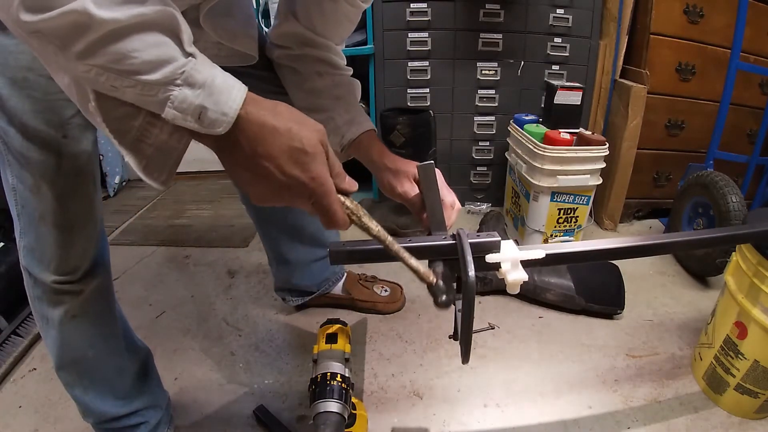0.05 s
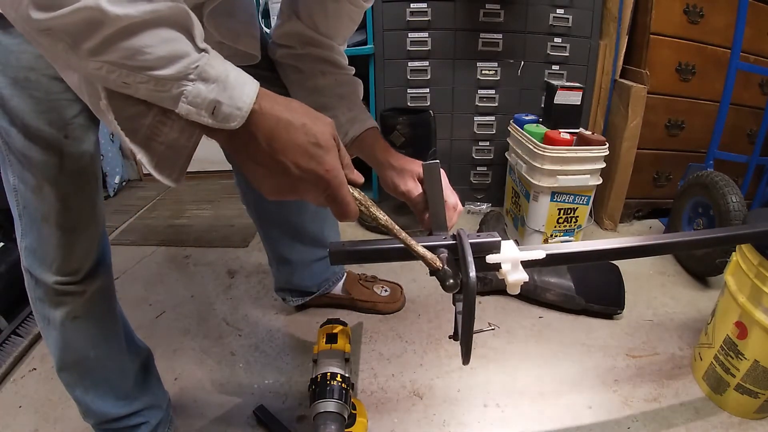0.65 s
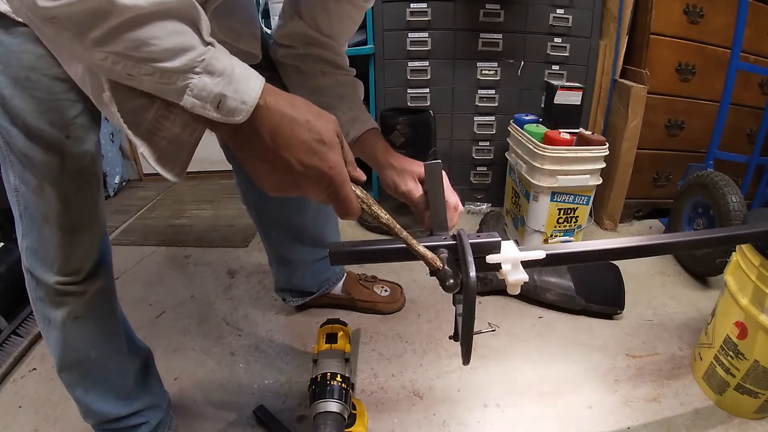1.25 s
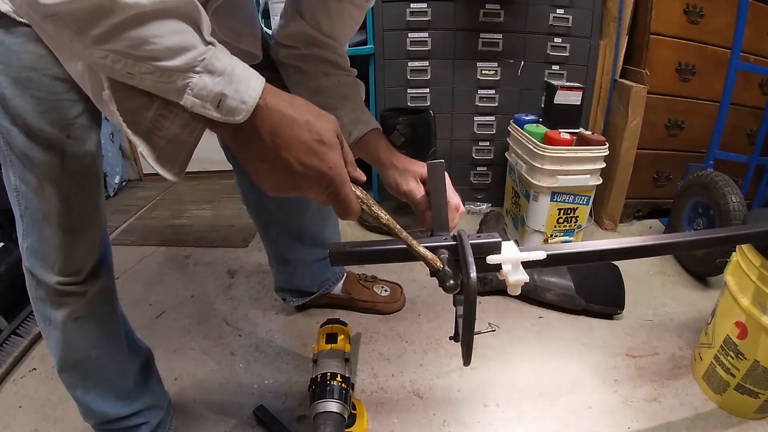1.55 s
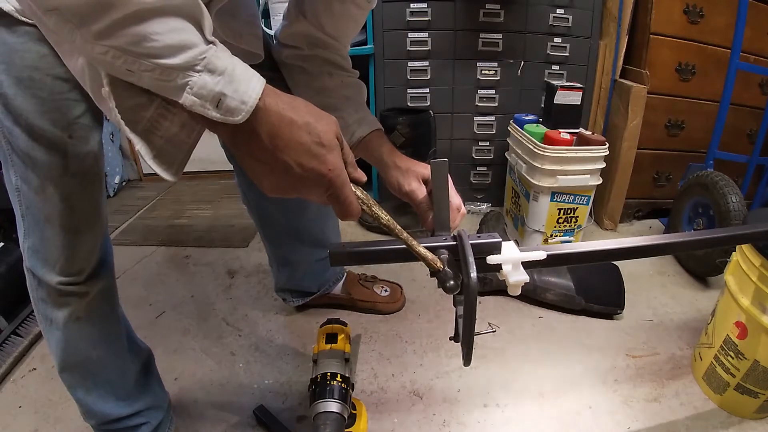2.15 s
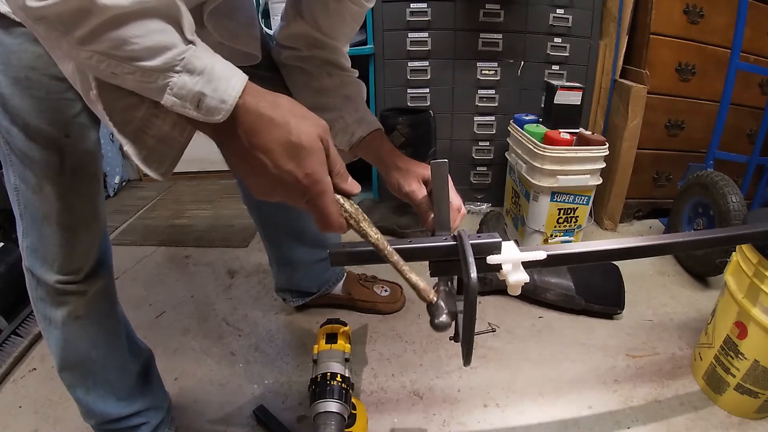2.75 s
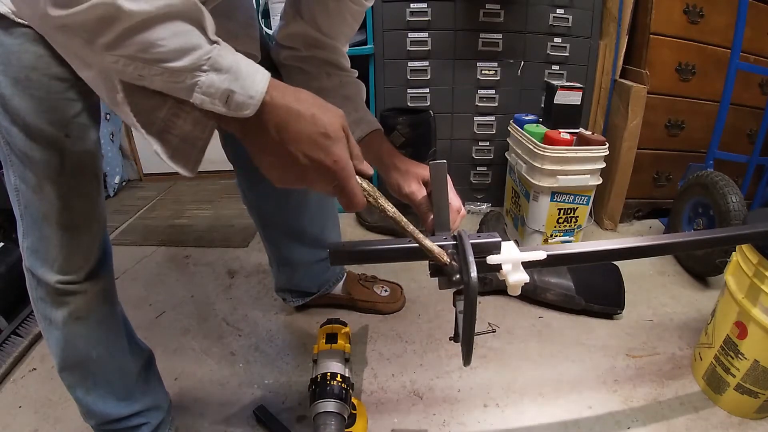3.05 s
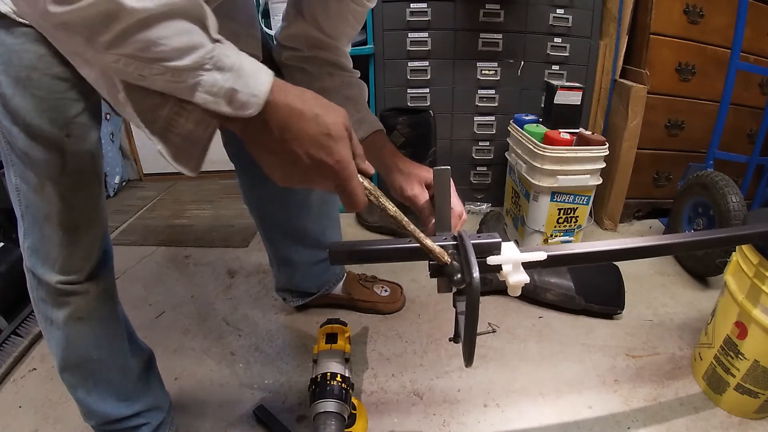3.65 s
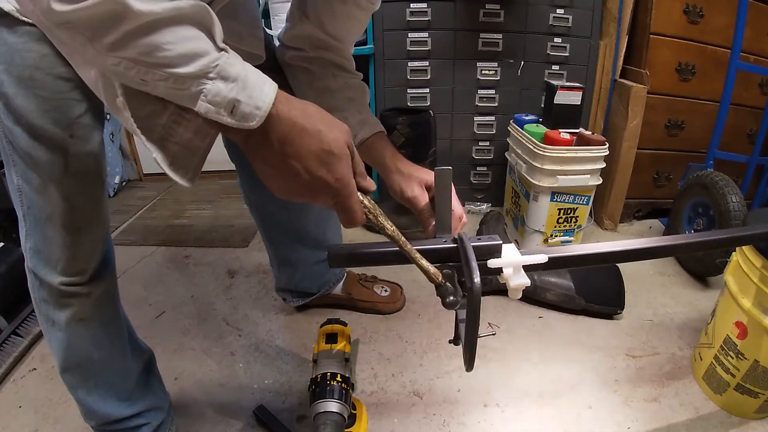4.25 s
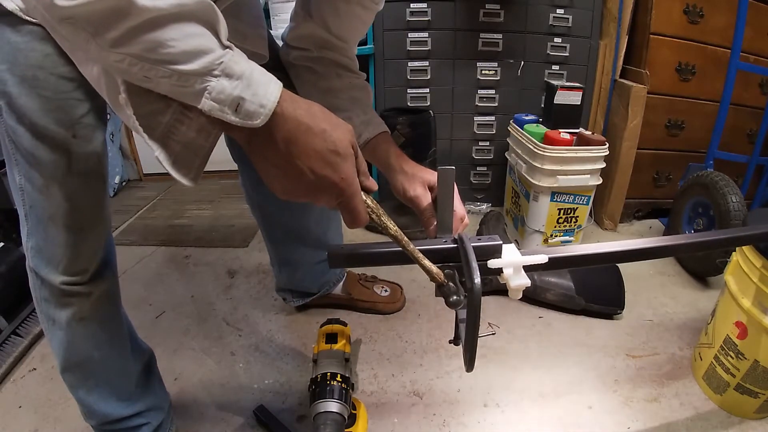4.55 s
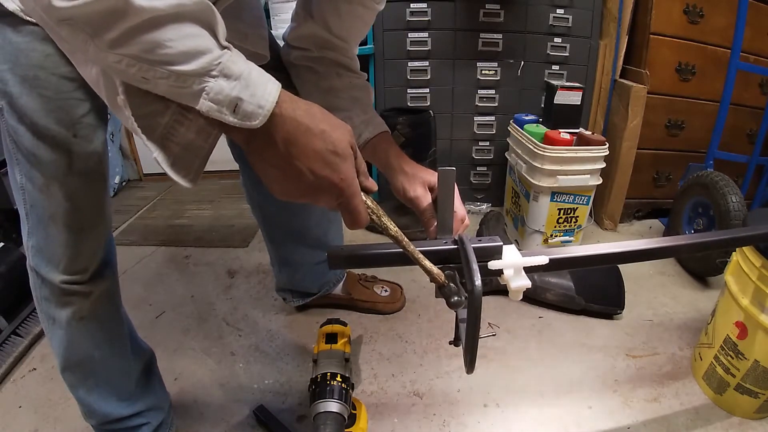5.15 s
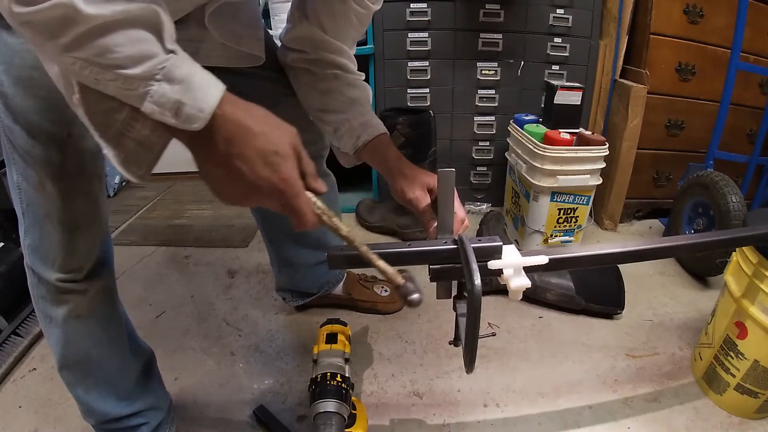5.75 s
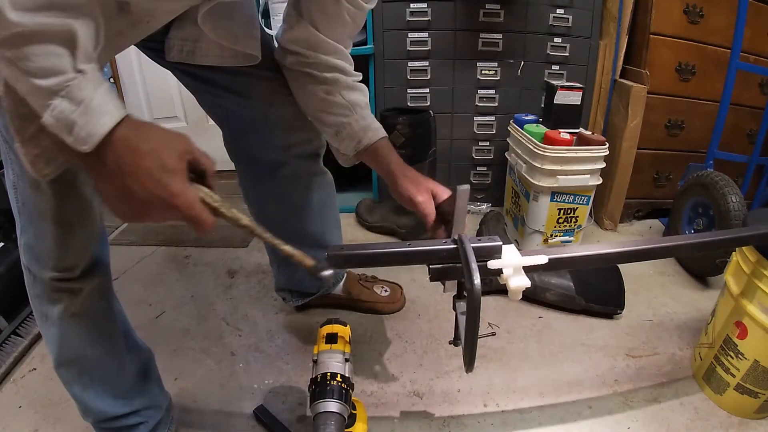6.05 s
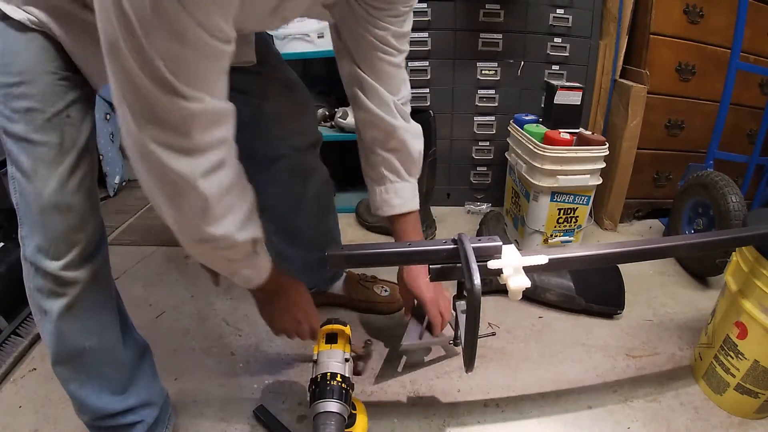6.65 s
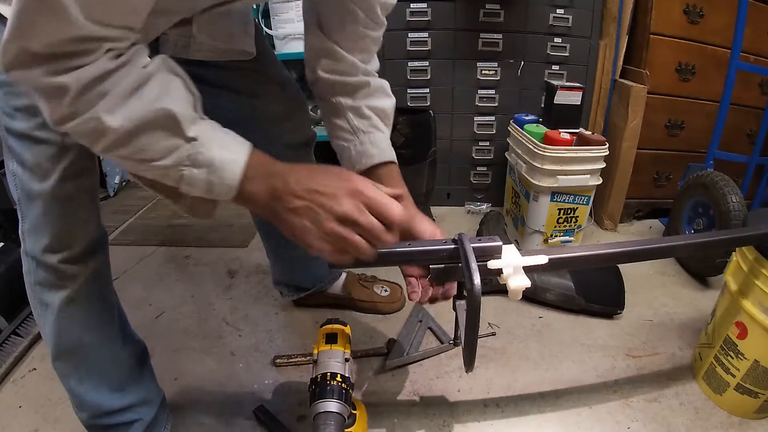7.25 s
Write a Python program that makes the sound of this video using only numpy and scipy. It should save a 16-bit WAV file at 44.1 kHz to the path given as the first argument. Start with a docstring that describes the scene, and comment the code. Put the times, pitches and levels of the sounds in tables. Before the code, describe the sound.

In a garage with a faint motor hum, a hammer strikes a steel bracket twice, each blow a sharp crack with a thud and a short ring. After a pause come two more. A shoe scuffs, clothes rustle softly and the hammer ticks down on the concrete. Finally a metal square clacks on the floor and chatters, ringing brightly, as it is dragged. Everything is heard from near the floor.

```python
"""In a garage, over a faint motor hum, a hammer knocks a steel bracket along a square tube:
four hard blows with a thud and a short ring. The head rubs the bracket as the worker shifts on soft
soles. The worker draws a try square off the tube, steps back with a scuff, bends with rustling
clothes and lays the hammer on the concrete. The metal square then clacks on the floor and chatters,
ringing, as it is dragged."""
import sys
import numpy as np
from scipy import signal
from scipy.fft import rfft, irfft
from scipy.io import wavfile
from scipy.ndimage import uniform_filter1d

SR = 44100
rng = np.random.default_rng(int(sys.argv[2]) if len(sys.argv) > 2 else 0)


def waveform_to_disk(signal):
    """Save audio, clipped to [-1, 1], as 16-bit WAV at the path in sys.argv[1]."""
    frames = np.transpose(np.atleast_2d(signal))
    scaled = np.clip(frames, -1, 1) * 32767
    samples = np.round(scaled).astype(np.int16)
    wavfile.write(sys.argv[1], SR, samples)


N = 322352
TIME_S = np.arange(N) / SR
AGE_S = np.arange(int(.8 * SR)) / SR


def from_db(db):
    """Decibels to gain."""
    return 10 ** (np.asarray(db) / 20)


def at_hz(points, hz):
    """Read a table on a log-frequency axis."""
    points = np.array(points)
    return np.interp(np.log(np.maximum(hz, 1)), np.log(points[:, 0]), points[:, 1])


def add(out, start_s, sound):
    """Mix a sound in; what lies outside is dropped."""
    start = int(round(start_s * SR))
    first, last = max(start, 0), min(start + len(sound), len(out))
    out[first:last] += sound[first - start:last - start]


def noise(spectrum, size=N):
    """Coloured noise, rms 1."""
    gain = from_db(at_hz(spectrum, np.fft.rfftfreq(size, 1 / SR)))
    coloured = irfft(rfft(rng.standard_normal(size)) * gain, size)
    return coloured / np.std(coloured)


def grain(depth_db):
    """Friction catches and lets go: a gain that flutters every few milliseconds."""
    flutter = uniform_filter1d(rng.standard_normal(N), size=130)
    return from_db(depth_db * flutter / np.std(flutter))


def stroke(start_s, level_db, attack_s, fall_db_per_s, hold_s=0):
    """Gain of one movement: linear rise, hold, exponential fall."""
    age_s = TIME_S - start_s
    falling_s = np.maximum(age_s - attack_s - hold_s, 0)
    return np.clip(age_s / attack_s, 0, 1) * from_db(level_db - fall_db_per_s * falling_s)


def click(spectrum, size=2048):
    """Minimum-phase pulse of a given colour, energy 1."""
    gain = from_db(at_hz(spectrum, np.fft.rfftfreq(size, 1 / SR)))
    cepstrum = irfft(np.log(gain))
    cepstrum[1:size // 2] *= 2
    cepstrum[size // 2:] = 0
    pulse = irfft(np.exp(rfft(cepstrum)))
    return pulse / np.linalg.norm(pulse)


def ring(modes, scatter_db=0, phase_rad=0):
    """Struck modes die away; scatter varies their strengths as the point of impact would."""
    pitch_hz, level_db, t60_s = np.transpose(modes)[:, :, None]
    polarity = (-1) ** np.arange(len(modes))[:, None]
    strength = polarity * from_db(level_db + scatter_db * rng.standard_normal(level_db.shape))
    decay = from_db(-60 * AGE_S / t60_s)
    return np.sum(strength * decay * np.sin(2 * np.pi * pitch_hz * AGE_S + phase_rad), axis=0)


# echo colour: freq_hz, gain_db
ECHO_SPECTRUM = [(60, -12.5), (150, -4), (400, 1), (1000, -4), (2000, -10.5), (3200, -7), (5000, -2),
                 (7500, -8.5), (10000, -13.5), (15000, -15)]
# echo decay: freq_hz, t60_s
ECHO_DECAY = [(60, 0.3), (200, .32), (700, 0.31), (3000, .28), (7000, .27), (14000, 0.063)]
def garage(sound, build_s=.01):
    """Echoes off floor, cabinets and walls thicken, then die away band by band."""
    edges_hz = np.geomspace(40, 18000, 19)
    white = rng.standard_normal((2, len(AGE_S)))
    response = np.zeros(len(AGE_S))
    for k, (low_hz, high_hz) in enumerate(zip(edges_hz, edges_hz[1:])):
        centre_hz = np.sqrt(low_hz * high_hz)
        bandpass = signal.butter(2, [low_hz, high_hz], "band", fs=SR, output="sos")
        envelope = (1 - np.exp(-AGE_S / build_s)) * from_db(-60 * AGE_S / at_hz(ECHO_DECAY, centre_hz))
        band = signal.sosfilt(bandpass, white[k % 2]) * envelope
        gain = np.sqrt(2 * (high_hz - low_hz) / SR) * from_db(at_hz(ECHO_SPECTRUM, centre_hz))
        response += gain * band / np.linalg.norm(band)
    return signal.fftconvolve(sound, response)[:len(sound)]


# blows, gains per part: start_s, crack_db, bracket_db, bolt_db, head_db, thud_db
BLOWS = [(-.012, -4.5, 0, -6.5, 10, -8), (0.2994, -1, -4, 5.5, 6.5, -1), (3.0991, -1.5, 3, -3.5, -1, 1.5),
         (3.7155, 0.5, 3.5, -8, -4.5, 1.5)]
# steel meeting steel: freq_hz, relative_db
CRACK_SPECTRUM = [(100, -12.5), (400, -13.5), (900, -8.5), (1500, 0), (2200, 5.5), (3200, 5), (4300, -2.5),
                  (5500, -1.5), (7500, -5), (9000, -11), (11000, -15.5), (13500, -24), (15000, -38)]
# contact point, floor-borne frame, bracket with tube, bolt, hammer head: pitch_hz, level_db, t60_s
CLANK_MODES = [(2250, -4.5, 0.002), (3000, -11.5, 0.025), (4100, -8, 0.0073), (4904, -11.5, 0.019),
               (6790, -15.5, 0.022)]
FRAME_MODES = [(40.3, -18.5, 0.056), (95, -18, 0.041), (131.6, -28.5, 0.16), (161, -25.5, 0.11),
               (205.4, -25.5, 0.077), (297, -34, .08), (386, -40.5, .07)]
BRACKET_MODES = [(3055, -28, .07), (3112, -26, .13), (3152, -28, .12), (3171, -25, .19), (3205, -17, .035),
                 (3237, -25, .09), (3264, -24, .1), (3319, -27, .1), (2412, -45, .25), (2900, -31, .07),
                 (3580, -35, .12), (4043, -40, .1), (4800, -42, .16), (5305, -35, .07), (6915, -27, .06),
                 (7700, -37, .07)]
BOLT_MODES = [(4435, -28, .07), (4650, -27.5, 0.044), (4960, -30, .06), (5440, -32.5, 0.06),
              (9190, -33, .07)]
HEAD_MODES = [(10112, -52, .45), (13792, -52, .33)]
def hammer_blows(echo_send_db=3.5):
    """Each blow cracks, rings the bracket, its bolt and the hammer head, and jolts the frame."""
    out = np.zeros(N)
    for start_s, crack_db, bracket_db, bolt_db, head_db, thud_db in BLOWS:
        knock = from_db(crack_db - 1) * ring(CLANK_MODES) + from_db(thud_db) * ring(FRAME_MODES)
        add(knock, 0, from_db(crack_db + 10) * click(CRACK_SPECTRUM))
        steel = from_db(bracket_db) * ring(BRACKET_MODES, scatter_db=-.5)
        steel += from_db(bolt_db) * ring(BOLT_MODES)
        head = from_db(head_db) * ring(HEAD_MODES)
        echo = garage(knock + from_db(echo_send_db) * steel)
        add(out, start_s, knock + steel + head + echo)
    return out


# motor tones: pitch_hz, relative_db
HUM_TONES = [(242.2, -66), (360.7, -73.5), (393.0, -81.5), (602.9, -83.5)]
# room air, motor rumble: freq_hz, relative_db
AIR_SPECTRUM = [(76, -39.5), (130, -10), (168, -4), (209, -13.5), (241, 2), (266, -12), (395, -12.5),
                (512, -22.5), (986, -21.5), (1130, -31), (4120, -42.5), (4930, -36.5), (10300, -62),
                (15000, -67.5)]
RUMBLE_SPECTRUM = [(20, -15.5), (40, -15.5), (72, 4.5), (100, -10.5), (150, -11), (300, -43.5),
                   (1000, -79.5)]
# air level, early and late spans: time_s, level_db
AIR_LEVELS = [
    [(0.55, -65), (1.47, -63), (2.95, -67)],
    [(3.4, -73), (4.468, -65), (5.3, -64)],
]
def motor_and_air(hum_to_air_db=-4, rumble_db=-75):
    """A distant motor hums under soft room air; its rumble swells once, slowly."""
    hum = sum(from_db(db) * np.sin(2 * np.pi * (hz * TIME_S + rng.random())) for hz, db in HUM_TONES)
    air_and_hum = noise(AIR_SPECTRUM) + from_db(hum_to_air_db) * hum / np.std(hum)
    air_gain = from_db(np.interp(TIME_S, *np.concatenate(AIR_LEVELS).T))
    swell = stroke(start_s=.5, level_db=-64.5, attack_s=1, fall_db_per_s=7)
    return air_gain * air_and_hum + (from_db(rumble_db) + swell) * noise(RUMBLE_SPECTRUM)


# glancing steel: freq_hz, relative_db
GRAZE_SPECTRUM = [(120, -38), (200, -9.5), (759, -15.5), (922, -8.5), (1140, -16.5), (1460, -2),
                  (1950, -13.5), (2830, 1.5), (3260, -8.5), (4030, -7.5), (4730, -13), (5170, -3.5),
                  (14000, -61.5)]
def hammer_graze():
    """The hammer grazes the bracket just before the last blow."""
    contact = stroke(start_s=3.674, level_db=-30, attack_s=.001, fall_db_per_s=160)
    return contact * noise(GRAZE_SPECTRUM) * grain(depth_db=.8)


# head on bracket: start_s, level_db, attack_s
RUBS = [(4.091, -53.5, .005), (4.16, -51.5, .085), (5.625, -47.5, .052), (5.72, -54, .03)]
# rubbing steel: freq_hz, relative_db
RUB_SPECTRUM = [(120, -15), (200, -15), (301, -3.5), (349, -16), (831, -3), (947, -14), (1340, -5.5),
                (1500, -16), (1630, 1.5), (1790, -12), (2330, -12.5), (3340, -25), (4950, -23.5),
                (10000, -56), (13000, -87), (22000, -120)]
def hammer_rubs():
    """The head rubs the bracket, steel on steel with a fine grain."""
    contact = sum(stroke(*rub, fall_db_per_s=215) for rub in RUBS)
    return contact * noise(RUB_SPECTRUM) * grain(depth_db=2.4)


# weight shifts: start_s, level_db
SHIFTS = [(4.19, -59), (4.41, -51), (5.34, -58), (5.66, -57)]
# soft sole under load: freq_hz, relative_db
SHIFT_SPECTRUM = [(50, -48), (95, -23), (135, 5), (200, -2), (320, -21), (700, -24), (3000, -55)]
def weight_shifts():
    """Soft soles press dully on the floor and ease off."""
    pressure = sum(stroke(*shift, attack_s=.09, fall_db_per_s=105) for shift in SHIFTS)
    return pressure * noise(SHIFT_SPECTRUM)


# steps: start_s, level_db
STEPS = [(4.418, -62), (6.073, -28)]
# sole scraping concrete: freq_hz, relative_db
SOLE_SPECTRUM = [(35, -62), (60, -33), (178, 2), (448, -4.5), (591, -10), (648, -4.5), (744, -13.5),
                 (1030, -9), (1100, -17.5), (1630, -13), (1750, -15.5), (2840, -19.5), (4840, -22),
                 (15000, -64.5)]
def shoe_scuffs():
    """The shoe lands, slides and stops."""
    tread = sum(stroke(*step, attack_s=.012, hold_s=.04, fall_db_per_s=220) for step in STEPS)
    return tread * noise(SOLE_SPECTRUM) * grain(depth_db=.75)


# blade on tube: freq_hz, relative_db
BLADE_SPECTRUM = [(500, -10), (1300, -12), (1550, 0), (1900, -13), (3300, -17), (3810, 1), (4210, -12),
                  (4660, -5), (5300, -17), (7300, -21), (10000, -44)]
# tightly gripped square against tube: pitch_hz, level_db, t60_s
BUMP_MODES = [(662, -38, 0.15), (1030, -38, 0.051), (1594, -30.5, 0.092), (2330, -35, 0.036),
              (2805, -30.5, 0.057), (3040, -27.5, 0.048), (5100, -37, .04)]
def square_lifted(bump_s=6.0772):
    """The blade hisses along the tube, pressed ever harder, then bumps it on lifting off."""
    pressure = stroke(start_s=5.56, level_db=-59.5, attack_s=.38, fall_db_per_s=110)
    hiss = pressure * noise(BLADE_SPECTRUM) * grain(depth_db=.8)
    bump = np.zeros(N)
    add(bump, bump_s, ring(BUMP_MODES))
    return hiss + bump + garage(bump)


# rustle: freq_hz, relative_db
CLOTH_SPECTRUM = [(150, -12), (300, -0.5), (800, -13.5), (1700, -7), (2600, -12), (4500, -10),
                  (6500, -14.5), (9000, -31.5), (15000, -58)]
def clothes():
    """Cloth slides over cloth, louder as the worker bends."""
    bend = stroke(start_s=6.15, level_db=-53.5, attack_s=.42, fall_db_per_s=3)
    return bend * noise(CLOTH_SPECTRUM) * grain(depth_db=.6)


# head meets floor: start_s, relative_db
TOUCHES = [(6.671, -24), (6.752, 1), (6.771, -4.5)]
# head tick on concrete, sliding handle: freq_hz, relative_db
TICK_SPECTRUM = [(88, -49), (150, -24), (300, -24), (567, -5), (833, -15), (1090, -20), (1490, -15),
                 (2140, -9), (2970, -12), (3270, -13), (4120, -10.5), (5000, -21), (5400, -7), (15000, -65)]
HANDLE_SPECTRUM = [(59, -53), (100, -18.5), (196, -3), (283, -12.5), (330, -3.5), (416, -9), (577, -4),
                   (972, -15), (1050, -9), (1870, -18.5), (3210, -16), (10000, -62), (13000, -83),
                   (22000, -120)]
def hammer_laid_down(tick_db=-26, tick_decay_s=.012, rock_gap_s=.029, rock_loss_db=4.7, echo_db=-4.5):
    """The head ticks on the concrete and rocks, weaker each time, while the handle slides and slows."""
    last_touch_s = TOUCHES[-1][0]
    rocks = [(last_touch_s + (k + 1) * rock_gap_s, -22 - k * rock_loss_db) for k in range(4)]
    ticks = np.zeros(N)
    for start_s, relative_db in TOUCHES + rocks:
        tick = noise(TICK_SPECTRUM, len(AGE_S)) * np.exp(-AGE_S / tick_decay_s)
        add(ticks, start_s, from_db(tick_db + relative_db) * tick)
    slide = stroke(start_s=6.752, level_db=-40, attack_s=.02, hold_s=.06, fall_db_per_s=50)
    handle = slide * noise(HANDLE_SPECTRUM) * grain(depth_db=2.4)
    return ticks + from_db(echo_db) * garage(ticks) + handle


# square damped by the hand, square ringing freely: pitch_hz, level_db, t60_s
CLACK_MODES = [(3980, 0, 0.0047), (4350, -15.5, 0.017), (5570, 2, 0.0037), (5670, -27, 0.14)]
SQUARE_MODES = [(1427, -41, .45), (1997, -37, .6), (2417, -28, .3), (2877, -26, .6), (3203, -44, .5),
                (3490, -20, .4), (3952, -17, .7), (4021, -26, .3), (4479, -43, .5), (4802, -18, .7),
                (5278, -20, .4), (5611, -28, .4), (6175, -31, .6), (6665, -36, .4), (7038, -27, .6),
                (7226, -34, .6), (7727, -41, .4), (8021, -47, .4), (9039, -46, .3), (9738, -53, .4),
                (10050, -48, .4), (12320, -59, .2), (12750, -62, .2), (13530, -59, .2), (13950, -58, .15),
                (14900, -61, .12)]
# edge bounces: start_s, gain_db
BOUNCES = [(7.0158, -1), (7.036, 1), (7.0902, -2), (7.0955, 0), (7.1145, -1), (7.1505, -1.5), (7.166, -7),
           (7.184, -2.5), (7.207, -6), (7.245, -5), (7.27, -6.5), (7.283, -4), (7.293, -10.5)]
# edge on gritty concrete: freq_hz, relative_db
GRIT_SPECTRUM = [(200, -3), (1000, -9), (2500, -3), (4000, 21.5), (5500, 8.5), (7500, -4), (10000, -23),
                 (15000, -51)]
def square_dragged(clack_s=6.9936, clack_rise_s=.0003, contact_s=.00024, thump_s=.00546,
                   jog_rad=1.0, grind_decay_s=.062, grind_db=-32):
    """A corner clacks down, then the edge bounces and grinds; each bounce rings the plate anew."""
    plate, knocks, vigour = np.zeros((3, N))
    clack = ring(CLACK_MODES) * (1 - np.exp(-AGE_S / clack_rise_s))
    add(knocks, clack_s, from_db(7) * clack)
    thump = np.sin(np.pi * np.minimum(AGE_S / thump_s, 1)) ** 2
    hand_weight = stroke(clack_s, level_db=-18, attack_s=.05, hold_s=.04, fall_db_per_s=110)
    pitch_hz = np.array(SQUARE_MODES)[:, :1]
    ends_s = [start_s for start_s, _ in BOUNCES[1:]] + [N / SR]
    for (start_s, gain_db), end_s in zip(BOUNCES, ends_s):
        # each contact builds the new ring while it chokes the old one
        build = 1 - np.exp(-AGE_S / contact_s)
        choke = np.exp(-np.maximum(AGE_S - (end_s - start_s), 0) / contact_s)
        envelope = from_db(gain_db) * build * choke
        # the swing carries on through a contact, with a random jog
        phase_rad = 2 * np.pi * pitch_hz * start_s + jog_rad * rng.standard_normal(pitch_hz.shape)
        add(plate, start_s, envelope * ring(SQUARE_MODES, scatter_db=2.5, phase_rad=phase_rad))
        add(vigour, start_s, envelope * np.exp(-AGE_S / grind_decay_s))
        add(knocks, start_s, from_db(gain_db + 4) * click(GRIT_SPECTRUM))
        add(knocks, start_s, from_db(gain_db) * hand_weight[int(start_s * SR)] * thump)
    grind = from_db(grind_db) * vigour * noise(GRIT_SPECTRUM) * grain(depth_db=3)
    echo = from_db(-5) * garage(plate) + from_db(-1.5) * garage(knocks)
    return plate + knocks + grind + echo


def scene():
    """Mono mix, heard from one point near the floor."""
    hammering = hammer_blows() + hammer_graze() + hammer_rubs()
    moving = weight_shifts() + shoe_scuffs() + square_lifted() + clothes()
    tools_on_floor = hammer_laid_down() + square_dragged()
    return (hammering + moving + tools_on_floor + motor_and_air())[None]


def record(dry):
    """Soft clip of the hardest peaks, then a steep low-pass."""
    cutoff_hz = 15200
    clipped = dry / (1 + dry ** 8) ** (1 / 8)
    return signal.sosfilt(signal.ellip(10, .1, 90, cutoff_hz, fs=SR, output="sos"), clipped)


dry = scene()
out = record(dry)
waveform_to_disk(out)
```